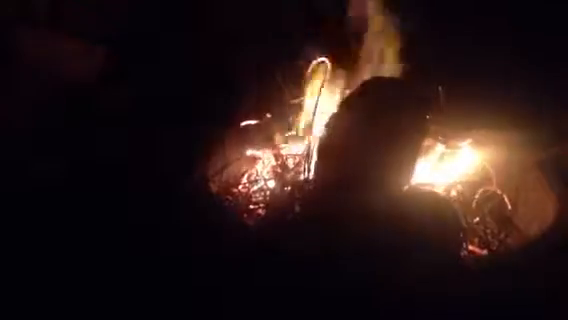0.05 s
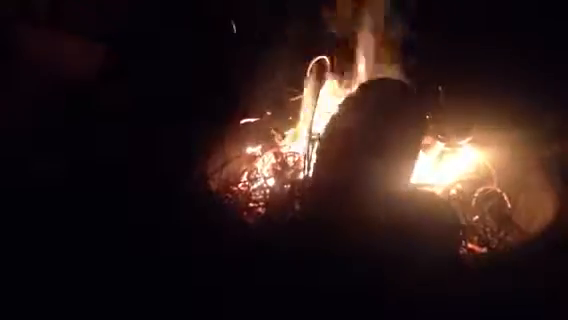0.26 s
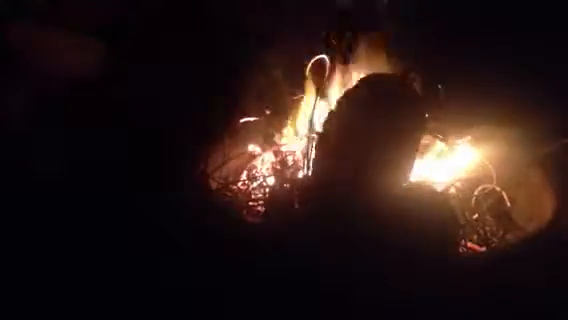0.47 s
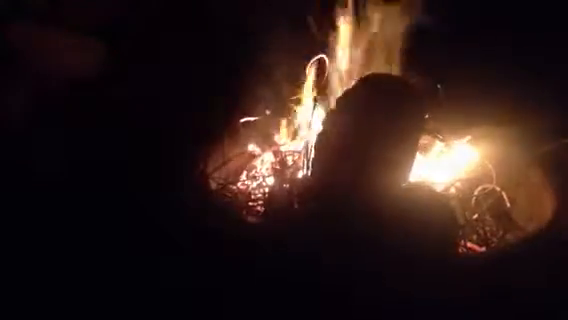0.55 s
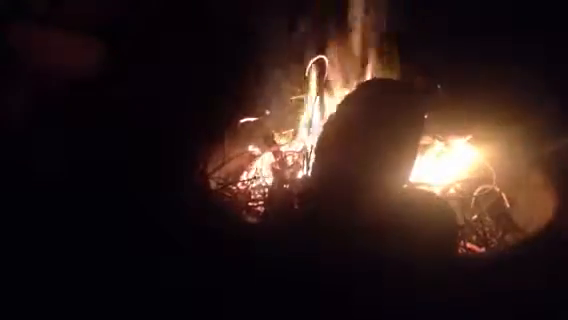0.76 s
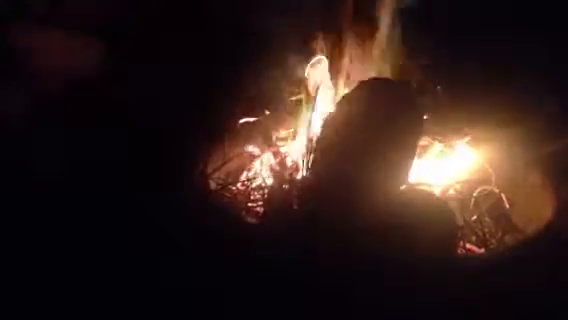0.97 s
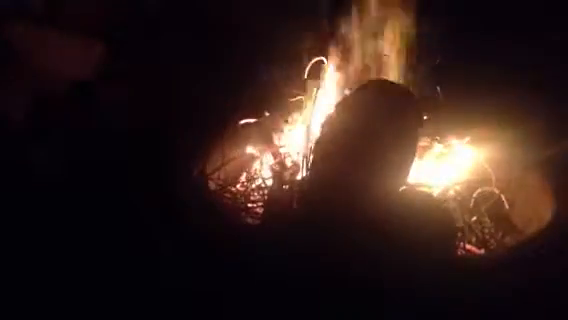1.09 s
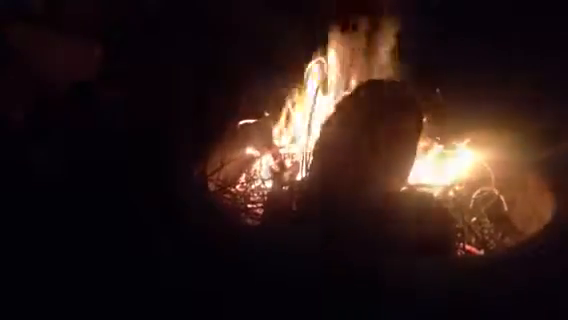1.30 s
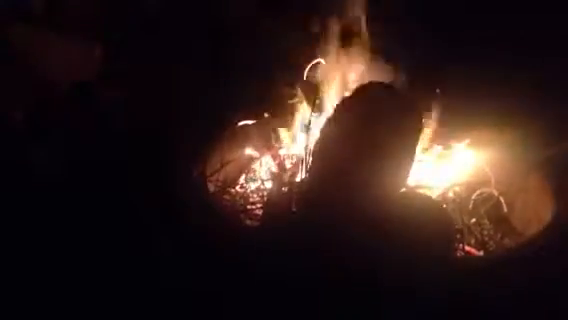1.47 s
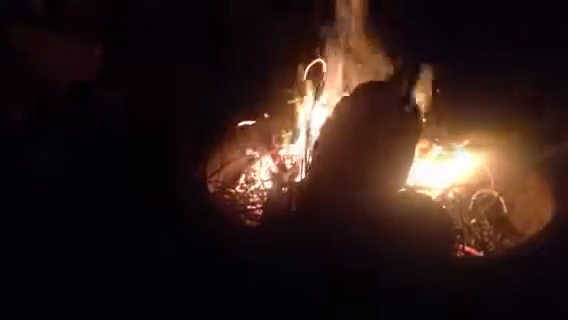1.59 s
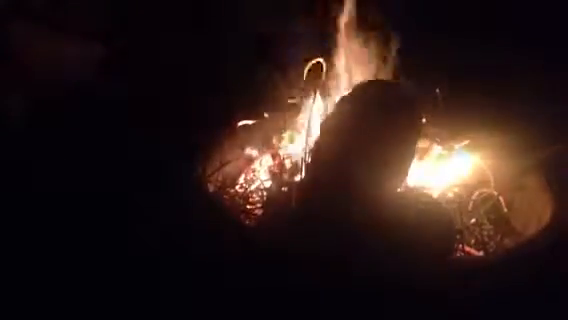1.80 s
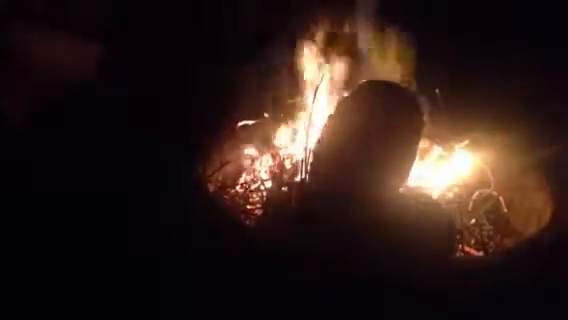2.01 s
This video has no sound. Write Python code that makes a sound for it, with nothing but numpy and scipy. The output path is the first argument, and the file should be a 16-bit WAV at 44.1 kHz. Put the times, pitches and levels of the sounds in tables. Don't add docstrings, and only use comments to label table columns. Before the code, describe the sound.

A bonfire burns outdoors, heard from a few steps away. Low fluttering roar, soft hiss, fine bark ticks and faint distant traffic hum continue throughout. A loud dry crack bursts at 0.23 s with quick reflections from logs and ground. Small pops follow, clustering near 0.97 and 1.36 s; a sharp bright snap lands at 1.5 s, then scattered light pops until about 2 s.

```python
import sys
import numpy as np
from scipy import signal
from scipy.fft import rfft, irfft, next_fast_len
from scipy.io import wavfile

SR = 44100
rng = np.random.default_rng(int(sys.argv[2]) if len(sys.argv) > 2 else 0)


def generate_wav(sig):
    pcm = np.round(np.clip(np.atleast_2d(sig).T, -1, 1) * 32767).astype(np.int16)
    wavfile.write(sys.argv[1], SR, pcm)


def ratio(d):
    e = np.asarray(d, float) / 20
    return 10 ** e


N = 90404

# f/Hz, level/dB
HUM_SPECTRUM = [(330, -25), (470, -5), (600, -4), (950, 0), (1380, -5), (2050, -12), (3000, -18),
                (4500, -35)]
# f/Hz, level/dB
HISS_SPECTRUM = [(1500, -20), (2600, -2), (3500, 1), (9000, -1), (12500, -4), (14000, -9), (15300, -6),
                 (15450, -40)]
# f/Hz, level/dB
ROAR_SPECTRUM = [(25, -46), (62, -28), (100, -19), (137, -5), (215, -1), (342, -6), (425, -14), (470, -24),
                 (620, -45)]
# t/s, level/dB
VIGOUR = [
    (0, -57),
    (.2, -55),
    (.82, -53.8),
    (1.3, -54.5),
    (1.5, -54.5),
    (1.75, -55),
    (2.05, -56),
]
# t/s, energy/dB, lowest f/Hz, highest f/Hz, splinter time/s
POPS = [(.3918, -37, 7500, 13000, .0002), (.4079, -36.5, 6000, 17000, .0003),
        (.5154, -42, 5000, 12000, .0006), (.6192, -38, 4800, 12000, .0008),
        (.6927, -40, 4500, 13000, .0008), (.9353, -41, 9500, 12500, .0006),
        (.9654, -29, 13500, 17000, .001), (.9657, -35, 7000, 12000, .0006),
        (.9667, -24, 8800, 12500, .0005), (.9685, -34, 7000, 16500, .0009),
        (1.3323, -38, 8500, 11500, .0006), (1.3624, -30, 6500, 12000, .0006),
        (1.3622, -25, 6900, 8100, .0012), (1.3621, -29, 14200, 15500, .0007),
        (1.402, -36, 14000, 15500, .0006), (1.3914, -35, 7500, 13000, .0002),
        (1.3974, -40, 9000, 11500, .0003), (1.4019, -34, 3300, 4600, .0006),
        (1.4019, -34, 5600, 6900, .0006), (1.402, -37, 8000, 9000, .0006),
        (1.50626, -12, 5000, 14800, .0001), (1.5063, -19, 6000, 7400, .0001),
        (1.5063, -27, 900, 1700, .0002), (1.50626, -6, 16000, 16900, .0001),
        (1.5078, -32, 7000, 10000, .0008), (1.5562, -38.5, 6500, 13000, .0003),
        (1.6023, -43, 4000, 12500, .001), (1.6341, -40, 4000, 17000, .0007),
        (1.6776, -32, 3500, 17000, .0013), (1.7966, -36, 8500, 18000, .0004),
        (1.8943, -36, 7000, 13000, .0004), (2.0055, -35, 5900, 7000, .001),
        (2.0098, -39, 6000, 7000, .0008), (2.0145, -36, 6000, 7100, .001), (2.023, -38, 13000, 16000, .001),
        (2.0248, -31.5, 3300, 11500, .0002)]
# t/s, peak level/dB, squeeze time/s, burst width/s
CRACK = (0.22994, -4.5, .00013, .000019)
# delay t/s, level/dB
LOG_ECHOES = [(.00031, -10.5), (.00050, -14), (.00067, -20), (.00090, -18), (.00132, -21), (.00172, -22),
              (.00210, -22), (.00232, -18), (.00260, -22)]
# f/Hz, width/Hz, level/dB
LOG_COLOUR = [(880, 300, 4.5), (1750, 300, -5), (2800, 500, -10), (3300, 400, -3), (4700, 500, -3),
              (5600, 500, -4), (11000, 500, -4), (13200, 900, -7), (15900, 900, -10)]
# f/Hz, width/Hz, level/dB
MIC_COLOUR = [(4300, 900, 2), (5100, 500, -7), (7500, 3000, 2), (12300, 3000, -8), (14300, 1500, 6)]

HUM_DB, HUM_RISE_DB = -64.5, 2.6
DRONE_HZ, DRONE_WIDTH_HZ, DRONE_DB = 140, 16, -67
WHISTLE_HZ, WHISTLE_WIDTH_HZ, WHISTLE_DB = 8330, 90, -84
HISS_DB, HISS_FOLLOWS_DB_PER_DB = -69.4, .2
TICKS_PER_S, TICK_DB, TICK_SPREAD_DB = 150, -64, 3.0
SPLINTER_SHARE, SPRAY_S = .4, .0006
KNOCK_DB, KNOCK_HZ, AIR_CUT_HZ = -18, 1500, 10000
GROUND_S, GROUND_DB = .0023, -17
SQUEEZE_SHARE = .19
SCATTER_T60_S, SCATTER_DB, SCATTER_CUT_HZ = .014, -28.5, 14000
TAIL_T60_S, TAIL_DB, TAIL_CUT_HZ = .15, -49, 19000
TOP_HZ, TOP_LEAK_DB = 15500, 16


def rms_one(x):
    return x / np.sqrt(np.mean(x ** 2) + 1e-20)


def at_hz(points, hz):
    table_hz, table_db = np.transpose(points)
    return np.interp(np.log(hz + 1), np.log(table_hz), table_db)


def drift(rate_hz):
    r = np.exp(-80 * np.pi * rate_hz / SR)
    noise = rng.standard_normal(N // 40 + 2002)
    slow = signal.lfilter([1], [1, -2 * r, r * r], noise)[2000:]
    return np.interp(np.arange(N) / 40, np.arange(len(slow)), rms_one(slow - slow.mean()))


def coloured(spectrum, shared_db, patchy_db, rate_hz):
    size = next_fast_len(N)
    hz = np.fft.rfftfreq(size, 1 / SR)
    noise = rfft(rng.standard_normal(size)) * ratio(at_hz(spectrum, hz))
    octave = np.log2(hz + 1)
    together = drift(rate_hz / 4)
    lowest, highest = int(np.log2(spectrum[0][0])), int(np.log2(spectrum[-1][0])) + 1
    out = 0
    for k in range(lowest, highest + 1):
        share = np.clip(1 - np.abs(octave - k), 0, 1)
        flicker = ratio(shared_db * together + patchy_db * drift(rate_hz))
        out = out + flicker * irfft(noise * share, size)[:N]
    return rms_one(out)


def resonance(x, hz, width_hz):
    r = np.exp(-np.pi * width_hz / SR)
    poles = [1, -2 * r * np.cos(2 * np.pi * hz / SR), r * r]
    return signal.lfilter([(1 - r * r) / 2, 0, (r * r - 1) / 2], poles, x + 1e-18)


def add_peaks(x, table):
    for hz, width_hz, db in table:
        x = x + (ratio(db) - 1) * resonance(x, hz, width_hz)
    return x


def narrow(hz, width_hz):
    once = resonance(rng.standard_normal(N), hz, width_hz)
    return rms_one(resonance(once, hz, width_hz))


def far_hum():
    nearer_db = HUM_RISE_DB * np.linspace(-.5, .5, N)
    air = ratio(HUM_DB + nearer_db) * coloured(HUM_SPECTRUM, shared_db=.4, patchy_db=.8, rate_hz=6.0)
    drone = ratio(DRONE_DB + 3 * nearer_db) * narrow(DRONE_HZ, DRONE_WIDTH_HZ)
    return air + drone


def sap_whistle():
    return ratio(WHISTLE_DB + 1.5 * drift(3.0)) * narrow(WHISTLE_HZ, WHISTLE_WIDTH_HZ)


def flame_hiss(vigour_db):
    hiss_db = HISS_DB + HISS_FOLLOWS_DB_PER_DB * (vigour_db - vigour_db.mean())
    return ratio(hiss_db) * coloured(HISS_SPECTRUM, shared_db=.8, patchy_db=.8, rate_hz=14.0)


def flame_roar(vigour_db):
    return ratio(vigour_db) * coloured(ROAR_SPECTRUM, shared_db=.3, patchy_db=.7, rate_hz=8.0)


def echo_cloud(t60_s, db, cut_hz):
    t = np.arange(8000) / SR
    dull = signal.butter(1, min(cut_hz, 19000), fs=SR, output="sos")
    noise = signal.sosfilt(dull, rng.standard_normal(8000))
    return noise * ratio(db - 60 * t / t60_s) * np.clip(t / .0004, 0, 1)


def add_echoes(bursts):
    pile = echo_cloud(SCATTER_T60_S, SCATTER_DB, SCATTER_CUT_HZ)
    yard = echo_cloud(TAIL_T60_S, TAIL_DB, TAIL_CUT_HZ)
    return bursts + signal.fftconvolve(bursts, pile + yard)[:N]


def bark_ticks():
    tick_db = TICK_DB + TICK_SPREAD_DB * np.minimum(rng.exponential(1, N), 2)
    impulses = ratio(tick_db) * rng.choice([-1, 1], N) * (rng.random(N) < TICKS_PER_S / SR)
    dealt = rng.integers(0, 8, N)
    out = np.zeros(N)
    for k, hz in enumerate(np.geomspace(3000, 13000, 8)):
        out += 3 * resonance(impulses * (dealt == k), hz, hz / 2)
    return out


def resin_pops():
    out = np.zeros(N + 900)
    t = np.arange(800) / SR
    knock = signal.butter(1, [KNOCK_HZ, 4 * KNOCK_HZ], "band", fs=SR, output="sos")
    for s, db, low_hz, high_hz, splinter_s in POPS:
        spray = rng.standard_normal(800) * np.exp(-t / max(splinter_s, 1e-4))
        burst = (t == 0) + SPLINTER_SHARE * min(splinter_s / SPRAY_S, 1) * spray
        energy = np.sum(burst ** 2)
        band = signal.butter(2, [low_hz, min(high_hz, 19000)], "band", fs=SR, output="sos")
        snap = signal.sosfilt(band, burst)
        snap = snap * np.sqrt(energy / np.sum(snap ** 2) * 2 * (high_hz - low_hz) / SR)
        breadth = min((high_hz - low_hz) / low_hz, 1)
        sound = snap - breadth * ratio(KNOCK_DB) * signal.sosfilt(knock, burst)
        i = int(s * SR)
        out[i:i + 800] -= ratio(db) * sound / np.sqrt(energy)
    air = signal.butter(1, AIR_CUT_HZ, fs=SR, output="sos")
    out = signal.sosfilt(air, ratio(2.5) * out)[:N]
    lag = int(GROUND_S * SR)
    return out + ratio(GROUND_DB) * np.concatenate([np.zeros(lag), out[:N - lag]])


def loud_crack():
    s, db, squeeze_s, width_s = CRACK
    out = np.zeros(N)
    near = np.arange(int(s * SR) - 100, int(s * SR) + 300)
    for delay_s, echo_db in [(0, 0)] + list(LOG_ECHOES):
        t = near / SR - s - delay_s
        squeeze = SQUEEZE_SHARE * np.exp(-np.abs(t) / squeeze_s)
        suction = 1.3 * np.exp(-.5 * (t / width_s) ** 2)
        out[near] += ratio(db + echo_db) * (squeeze - suction)
    out = add_peaks(out, LOG_COLOUR)
    return signal.sosfiltfilt(signal.butter(4, 510, "high", fs=SR, output="sos"), out)


def scene():
    vigour_db = np.interp(np.arange(N) / SR, *np.transpose(VIGOUR))
    background = far_hum() + sap_whistle()
    flames = flame_hiss(vigour_db) + flame_roar(vigour_db)
    bursts = add_echoes(bark_ticks() + resin_pops() + loud_crack())
    return (background + flames + bursts)[None]


def low_pass(x):
    return signal.sosfilt(signal.butter(12, 16500, fs=SR, output="sos"), x)


def record(dry):
    x = add_peaks(dry, MIC_COLOUR)
    x = signal.sosfilt(signal.cheby2(8, TOP_LEAK_DB, TOP_HZ, fs=SR, output="sos"), x)
    x = signal.sosfiltfilt(signal.cheby2(10, 30, 17000, fs=SR, output="sos"), x)
    return low_pass(x)


dry = scene()
out = record(dry)
generate_wav(out)
```